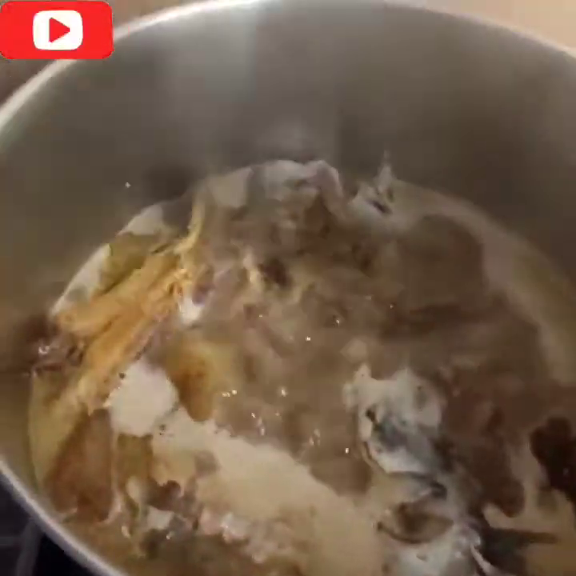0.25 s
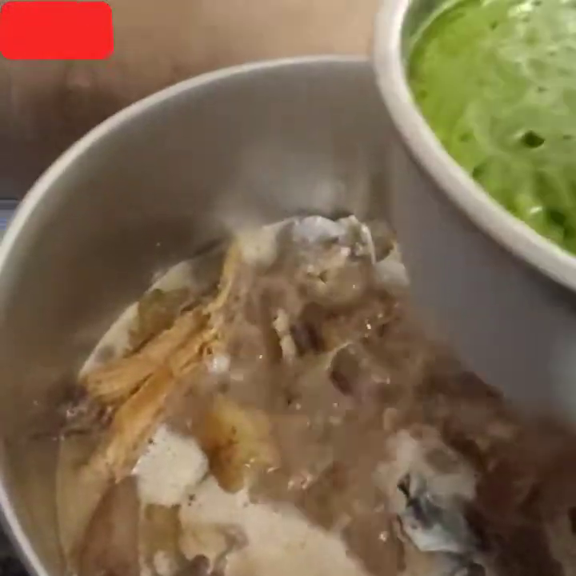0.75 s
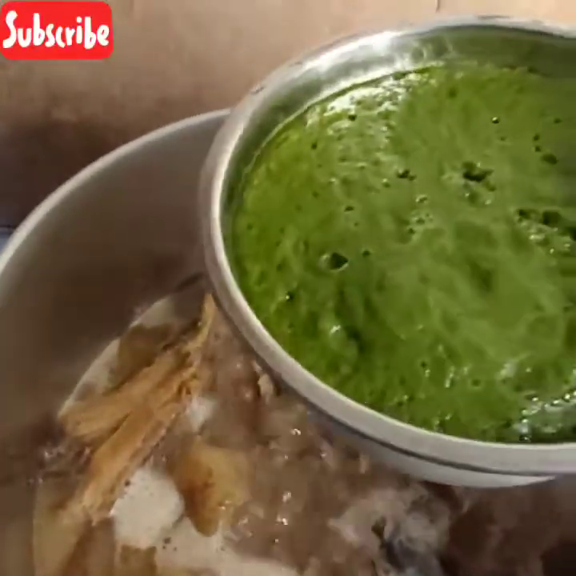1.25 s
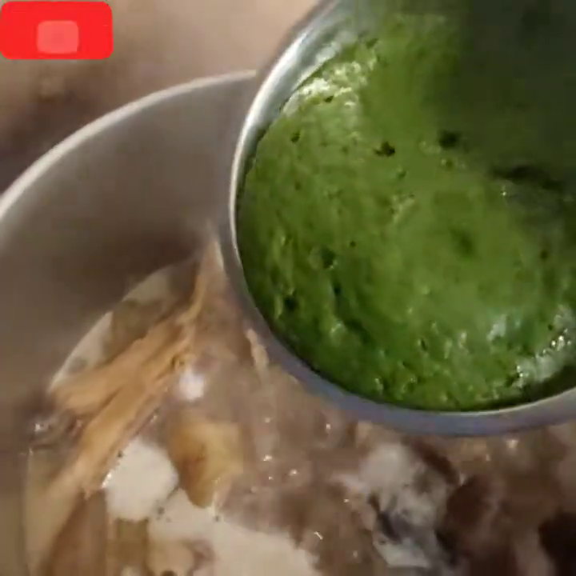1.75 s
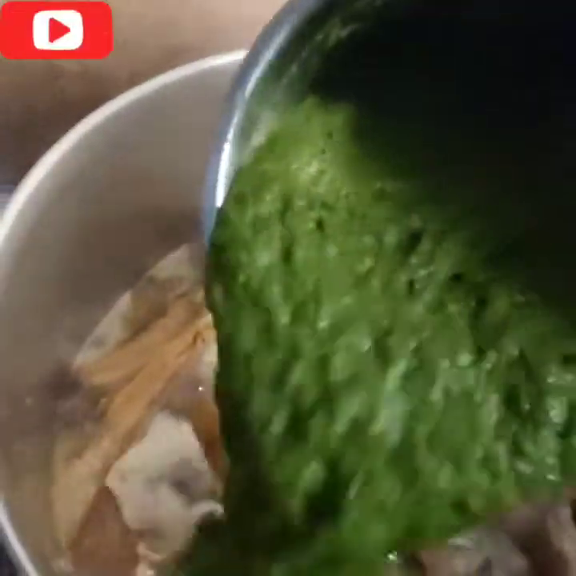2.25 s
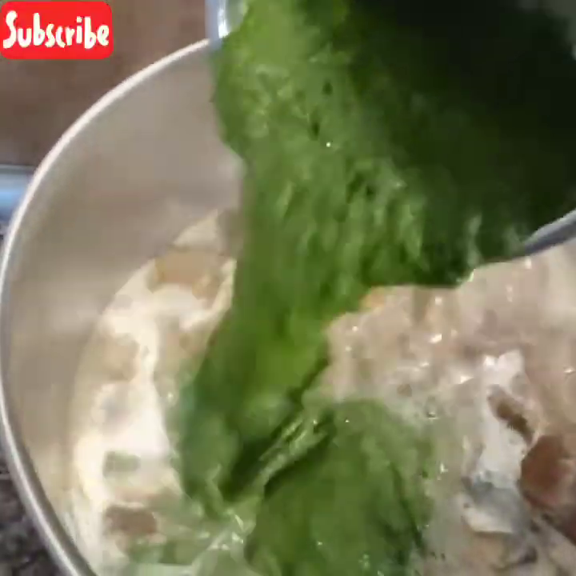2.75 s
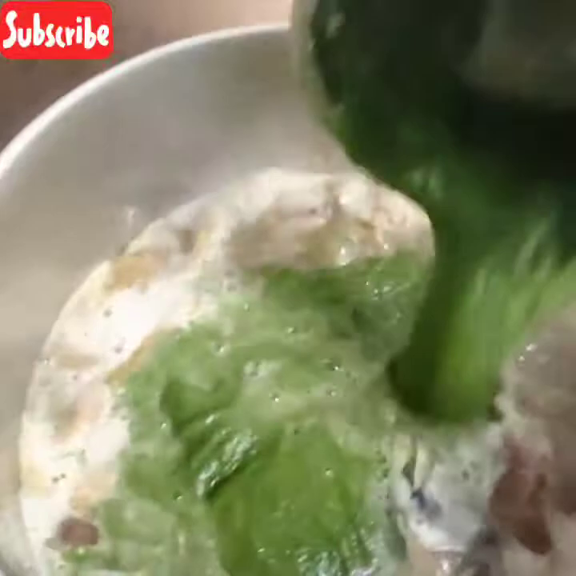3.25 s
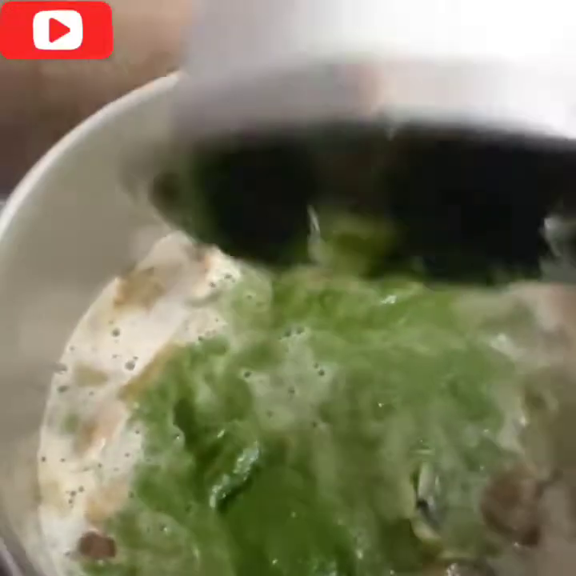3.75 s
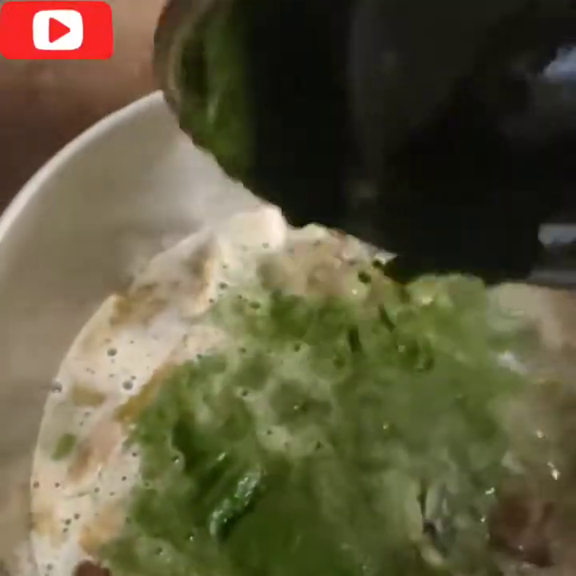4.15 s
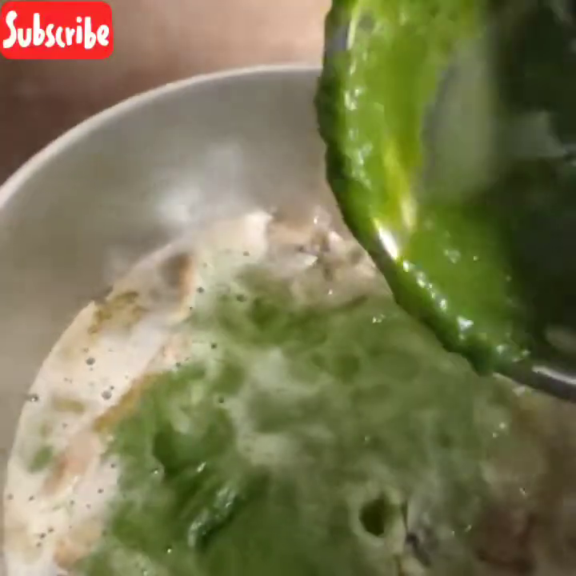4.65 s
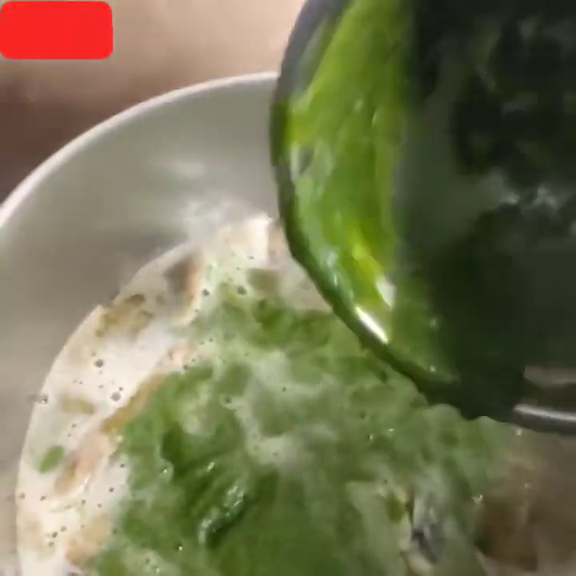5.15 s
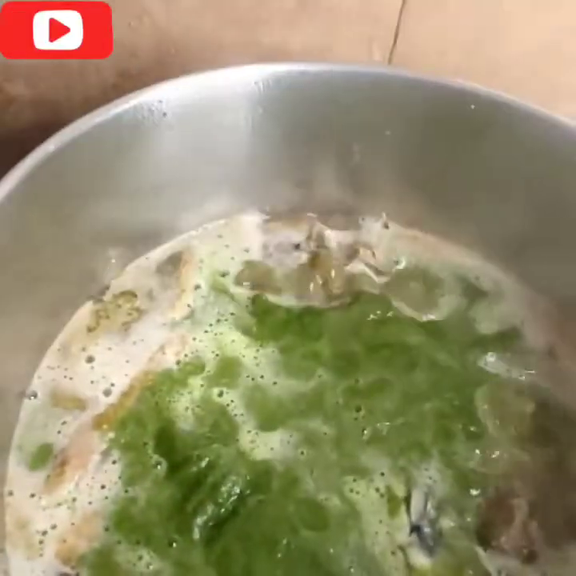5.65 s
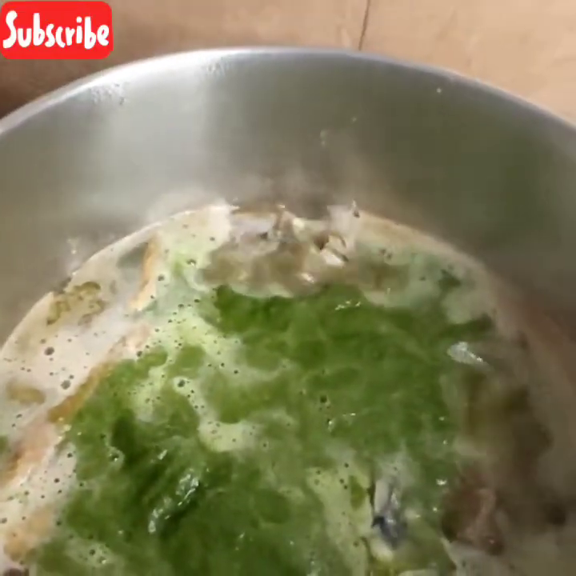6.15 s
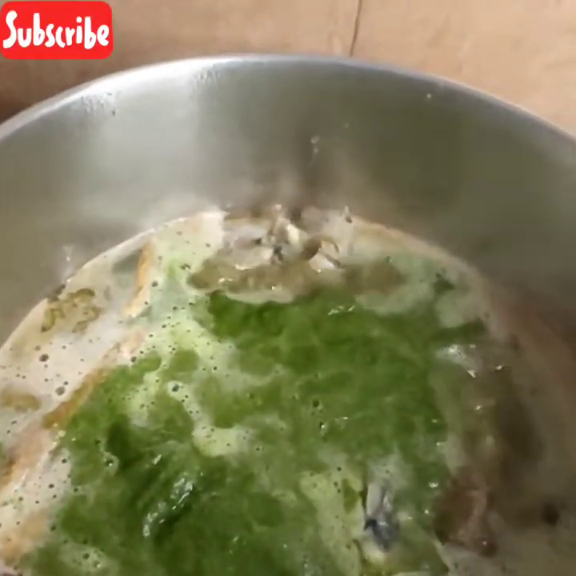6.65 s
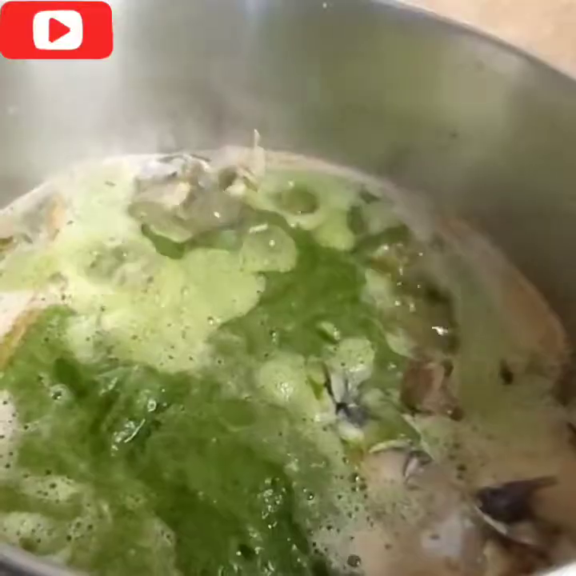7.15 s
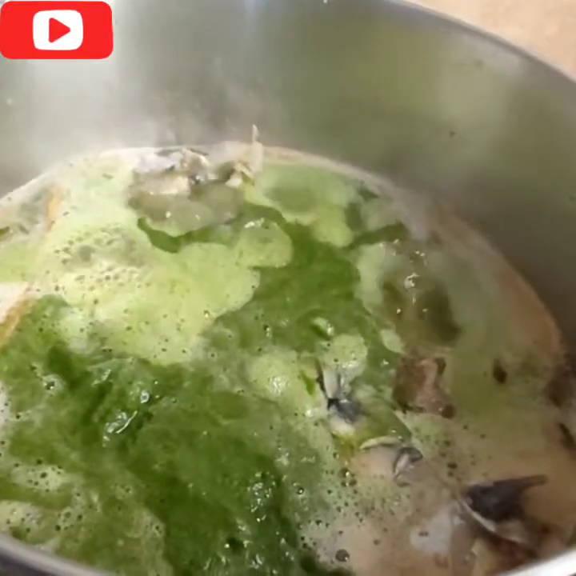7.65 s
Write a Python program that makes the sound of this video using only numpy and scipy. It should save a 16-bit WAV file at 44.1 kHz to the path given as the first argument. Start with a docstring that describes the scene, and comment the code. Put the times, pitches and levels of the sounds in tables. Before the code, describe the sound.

Thick soup boils in a steel pot, puree splatters in and muffles the bubbling, then an empty metal bowl knocks down sharply nearby.

```python
"""Soup boils in a steel pot: steam bubbles collapse in short sagging blips that ring the pot and its walls.
Bursting films spit as noise snaps and spray; froth, fizz and deep rumble are shaped noise and click trains.
A thick puree poured from a metal bowl splatters as wet smears and pings, then calms the boil.
The empty bowl lands nearby with a sharp knock and rocks once: contact pulses ring its modes in a small kitchen."""
import sys
import numpy as np
from scipy import signal
from scipy.fft import rfft, irfft
from scipy.io import wavfile
from scipy.ndimage import uniform_filter1d

SR = 44100
rng = np.random.default_rng(int(sys.argv[2]) if len(sys.argv) > 2 else 0)


def dump_mix(stems):
    """Bounce the given channels to the path in sys.argv[1] as a 16-bit WAV at rate SR."""
    frames = np.atleast_2d(stems).T  # one column per channel
    limited = np.clip(frames, -1, 1)  # hard clip at full scale
    pcm = np.round(limited * 32767).astype(np.int16)
    wavfile.write(sys.argv[1], SR, pcm)


N = 348831
TIME = np.arange(N) / SR
# the first puree reaches the broth, the stream is fullest, the stream breaks off (s)
POUR_START_S, POUR_FULLEST_S, POUR_END_S = 2.11, 2.75, 3.47


def gain_of(db):
    """Decibels to a factor."""
    return 10 ** (np.asarray(db) / 20)


def evened(x):
    """Scales to rms 1 over all channels."""
    return x / np.sqrt(np.mean(x ** 2) + 1e-20)


def unit(x):
    """Scales to energy 1 in each channel."""
    return x / np.sqrt(np.sum(x ** 2, -1, keepdims=True) + 1e-20)


def read(points, hz):
    """Reads a spectrum table on a log-frequency axis."""
    f, value = np.transpose(points)
    return np.interp(np.log(hz + 1), np.log(f + 1), value)


def follow_curve(points):
    """Draws a (time, value) table as a running curve."""
    return np.interp(TIME, *np.transpose(points))


def add(mix, s, sound):
    """Mixes a sound in at time s."""
    part = mix[..., max(round(s * SR), 0):][..., :sound.shape[-1]]
    part += sound[..., :part.shape[-1]]


def through(x, response):
    """Convolves, mono or stereo, and keeps the length of x."""
    return signal.oaconvolve(np.atleast_2d(x), np.atleast_2d(response), axes=1)[:, :x.shape[-1]]


def colour(x, points, size=8192):
    """A causal, minimum-phase filter with the given spectrum."""
    hz = abs(np.fft.fftfreq(size, 1 / SR))
    log_gain = np.log(gain_of(read(points, hz)))
    response = np.fft.ifft(np.exp(signal.hilbert(log_gain).conj())).real
    return through(x, response[:size // 2])


def pair(z, alike):
    """Makes two unrelated channels partly alike."""
    alike = np.clip(alike, 0, 1)
    return np.array([z[0], alike * z[0] + np.sqrt(1 - alike ** 2) * z[1]])


def noise_pair(alike, length=N):
    """Stereo white noise whose channels are partly alike."""
    return pair(rng.standard_normal((2, length)), alike)


def lean(x, points):
    """Tips a stereo sound to one side, band by band."""
    side_db = read(points, np.fft.rfftfreq(N, 1 / SR)) * np.array([[.5], [-.5]])
    return irfft(rfft(x) * gain_of(side_db), N)


def clicks(per_s, spread_db, count=6000):
    """A random train of mostly small and a few large impulses, at most `count` in all."""
    when, size, sign = rng.random((count, 3))[:int(per_s * N / SR)].T
    size = gain_of(spread_db * np.minimum(-np.log(1 - size), 3.5))
    return np.bincount((when * N).astype(int), size * np.sign(sign - .5), N)


def chance_events(gain, spread_db, hz, spread_octaves, count):
    """Rows (t/s, level/dB, f/Hz) at loose intervals, scattered around a running gain and pitch."""
    when, size, pitch = rng.random((count, 3)).T
    at = ((np.arange(count) + when) * N / count).astype(int)
    level_db = 20 * np.log10(gain[at]) + spread_db * (2 * size - 1)
    pitch_hz = (hz * np.ones(N))[at] * 2 ** (spread_octaves * (2 * pitch - 1))
    return np.transpose([at / SR, level_db, pitch_hz])


def ring(modes, apart_hz):
    """Dying modes; the higher ones reach the two microphones out of step."""
    t = np.arange(SR // 2) / SR
    sound = np.zeros((2, len(t)))
    for k, (hz, db, t60) in enumerate(modes):
        phase = (-1) ** k * np.array([[1], [-1]]) * min(hz / apart_hz, np.pi / 4)
        sound += gain_of(db - 60 * t / t60) * np.sin(2 * np.pi * hz * t + phase)
    return sound


# kitchen reverberation: (f/Hz, t60/s)
KITCHEN_DECAY = [(60, 0.16), (300, 0.047), (1000, 0.3), (3000, 0.4), (8000, 0.27), (16000, 0.17)]


def kitchen(x, alike_hz=650):
    """A diffuse tail, each band dying at its own speed, the bass alike on both sides."""
    hz, t, z = signal.stft(rng.standard_normal((2, SR // 2)), SR, nperseg=256)
    z = pair(z, 1 / (1 + (hz[:, None] / alike_hz) ** 4))
    z = z * gain_of(-60 * t / read(KITCHEN_DECAY, hz)[:, None])
    tail = signal.istft(z, SR, nperseg=256)[1]
    fade_in = np.clip(np.arange(tail.shape[1]) / SR / 0.005, 0, 1) ** 2
    return through(x, unit(tail * fade_in))


def scatter(t60, alike):
    """Dense reflections as noise that dies away over t60 seconds."""
    t = np.arange(SR // 5) / SR
    return unit(noise_pair(alike, len(t)) * gain_of(-60 * t / t60))


def places(count):
    """Sound comes from changing places: each place's share of it over time."""
    hop = SR // 40
    place = rng.integers(0, count, N // hop + 1).repeat(hop)[:N]
    return [np.sqrt(abs(uniform_filter1d(1. * (place == k), size=400))) for k in range(count)]


def walls(x, t60, alike, count=6):
    """Each place has its own pattern of reflections."""
    return sum(through(x * share, scatter(t60, alike)) for share in places(count))


def crackle(points, per_s, spread_db, hiss):
    """Countless tiny bursts with short echoes, over a smooth hiss, rms 1."""
    grains = walls(clicks(per_s, spread_db), t60=0.067, alike=0.014, count=4)
    return evened(colour(evened(grains) + hiss * rng.standard_normal((2, N)), points))


def pushes(contacts):
    """Contact force: longer contacts are duller, and the deepest bass is cut away."""
    force = np.zeros(N)
    for s, db, contact_ms in contacts:
        u = np.arange(SR // 50) / SR * 1000 / contact_ms
        push = u * np.exp(-4 * u)
        add(force, s, gain_of(db) * push / push.sum())
    return signal.sosfilt(signal.butter(3, 100, "highpass", fs=SR, output="sos"), force)


# rim chatter after each landing, and the landing that rings the bowl:
# (t/s, relative chatter level/dB, fade/s, relative ring level/dB, contact time/ms)
RIM_RATTLES = [(6.0445, -21.5, 0.05, -2, 0.17), (6.36, -32, 0.057, -3, 3.5)]
# chatter spectrum: (f/Hz, relative level/dB per Hz)
RATTLE_SPECTRUM = [(25, -52), (100, -11), (400, 5.5), (750, 2.5), (1000, -9), (1200, -6), (1500, -16),
                   (2100, -19), (2700, -21), (3400, -29.5), (6000, -37), (16000, -52)]


def rattle(rise_s=0.0018):
    """The rim chatters in many tiny contacts as the bowl settles."""
    chatter = np.zeros(N)
    for s, db, fade, _, _ in RIM_RATTLES:
        age = np.maximum(TIME - s, 0)
        chatter += gain_of(db) * (1 - np.exp(-age / rise_s)) * np.exp(-age / fade)
    return chatter * crackle(RATTLE_SPECTRUM, per_s=910, spread_db=7.5, hiss=0.47)


# the bowl meets the worktop: (t/s, relative level/dB, contact time/ms)
BOWL_KNOCKS = [(6.0438, -8.5, 0.1), (6.0457, 0.5, 1.6), (6.0495, -6.5, 0.24), (6.053, 3, 2.3),
               (6.0589, -18, 0.4), (6.0757, -8, 2), (6.3593, -9, 2.9), (6.366, -5.5, 2.6), (6.376, -8, 2.7),
               (6.393, -10, 5.3), (6.472, -17, 3)]
# thud spectrum: (f/Hz, relative level/dB)
THUD_SPECTRUM = [(20, -46), (60, -26), (120, -12), (220, 7.5), (420, 8.5), (800, 20.5), (1300, -11),
                 (2400, 5), (3400, -7), (5000, -1.5), (8000, -1), (11000, 4), (16000, -11)]
# modes of the metal bowl and the worktop under it: (f/Hz, relative level/dB, t60/s)
BOWL_MODES = [(122, -24, 0.25), (157, -19, 0.25), (287, -31, 0.3), (400, -24, 0.13), (450, -25, 0.2),
              (660, -24, 0.2), (758, -22, 0.26), (845, -33, 0.25), (1160, -20, 0.18), (1427, -42, 0.3),
              (1594, -26, 0.25), (1622, -21, 0.055), (1818, -27, 0.19), (1850, -30, 0.11),
              (1958, -33, 0.17), (2152, -23, 0.13), (2175, -33, .2), (2353, -33, 0.17), (2625, -38, 0.2),
              (2860, -37, 0.14), (3349, -49, .2), (4538, -51, 0.2), (4780, -35, 0.06)]


def bowl(thud_db=9, ring_db=2.5, clatter_db=11.5):
    """Rim and base land in quick succession on the worktop, and the metal rings on."""
    thud = colour(pushes(BOWL_KNOCKS), THUD_SPECTRUM)
    clatter = walls(thud, t60=0.022, alike=0.23)
    landings = pushes([(s, db, contact_ms) for s, _, _, db, contact_ms in RIM_RATTLES])
    ringing = through(landings, ring(BOWL_MODES, apart_hz=1500))
    return gain_of(thud_db) * thud + gain_of(clatter_db) * clatter + gain_of(ring_db) * ringing


# the puree spreads over the broth: (start t/s, end t/s)
PUREE_SPREAD = (2.4, 3.8)


def thickness():
    """0 in thin broth, 1 once the puree has spread over it."""
    return np.interp(TIME, PUREE_SPREAD, [0, 1])


def flow(start_db=-11, end_db=-11.5, land_s=0.015, drip_out_s=0.031):
    """The stream of puree swells to 1 at its fullest, thins, and drips out."""
    swell_db = np.interp(TIME, [POUR_START_S, POUR_FULLEST_S, POUR_END_S], [start_db, 0, end_db])
    landing = np.clip((TIME - POUR_START_S) / land_s, 0, 1)
    return gain_of(swell_db) * landing * np.exp(-np.maximum(TIME - POUR_END_S, 0) / drip_out_s)


def wetness(rest_db, thick_db, settle_db_per_s, pour_db):
    """Gain of a surface sound: steady on the broth, raised by the stream, then dying down under the puree."""
    settled_db = settle_db_per_s * np.maximum(TIME - POUR_END_S, 0)
    return np.hypot(gain_of(rest_db + thick_db * thickness() - settled_db), gain_of(pour_db) * flow())


# bubbles that stand out of the boil: (t/s, relative level/dB, nominal pitch f/Hz)
LOUD_POPS = [(0.07, -14, 770), (0.092, -15.5, 865), (0.181, -13, 790), (0.215, -18.5, 654),
             (0.327, -14, 720), (0.381, -19, 804), (0.493, -19, 610), (0.502, -18, 725), (0.559, -28, 674),
             (0.568, -10.5, 778), (0.598, -15, 660), (0.623, -12, 770), (0.73, -12, 682), (0.735, -16, 900),
             (0.771, -28, 630), (0.79, -18, 1070), (0.821, -21, 875), (0.882, -20, 706), (0.982, -16, 810),
             (1.056, -16.5, 626), (1.125, -32, 725), (1.156, -29, 710), (1.2, -13, 960), (1.21, -12.5, 854),
             (1.284, -17.5, 756), (1.301, -13, 900), (1.357, -17.5, 580), (1.396, -17, 660),
             (1.413, -13.5, 680), (1.46, -20, 970), (1.508, -13, 724), (1.552, -18, 694), (1.659, -19, 617),
             (1.719, -12, 680), (1.758, -15.5, 610), (1.778, -14, 750), (1.821, -17.5, 710),
             (1.86, -14, 724), (1.901, -14, 674), (1.991, -14.5, 643), (2.021, -19, 557), (2.075, -15, 660),
             (2.091, -7.5, 722), (2.12, -13, 646), (2.165, -7, 747), (2.217, -13.5, 674),
             (2.283, -17.5, 590), (2.31, -18.5, 700), (2.352, -15, 597), (2.381, -15.5, 720),
             (2.43, -17.5, 655), (2.492, -7, 786), (2.534, -10.5, 664), (2.621, -14.5, 586),
             (2.638, -15, 680), (2.666, -12, 710), (2.715, -9.5, 646), (2.822, -16.5, 542),
             (2.905, -15.5, 700), (2.928, -21, 650), (2.987, -17, 654), (3.152, -17, 540),
             (3.332, -20.5, 750), (3.436, -24.5, 710), (3.504, -19.5, 446), (3.522, -21, 630),
             (3.642, -17, 630), (3.649, -14, 700), (3.75, -15, 600), (3.867, -31, 476), (3.888, -22, 610),
             (3.931, -36, 540), (3.949, -23, 730), (3.963, -21.5, 670), (4.161, -20, 733), (4.26, -19, 715),
             (4.374, -25, 620), (4.387, -23, 720), (4.536, -29, 683), (4.578, -31, 640), (4.595, -24, 520),
             (4.621, -39, 710), (4.66, -39, 660), (4.753, -39, 535), (4.844, -28, 554), (4.98, -20, 627),
             (5.008, -19.5, 620), (5.034, -23, 686), (5.056, -37, 570), (5.095, -39, 590),
             (5.126, -43, 660), (5.174, -27.5, 490), (5.311, -26, 440), (5.341, -26, 485),
             (5.398, -23.5, 537), (5.438, -23.5, 570), (5.461, -36, 563), (5.503, -19.5, 564),
             (5.521, -20.5, 520), (5.635, -27, 640), (5.655, -24, 565), (5.841, -24.5, 680),
             (5.861, -26, 590), (5.901, -27.5, 620), (6.169, -26, 576), (6.505, -31.5, 614),
             (6.576, -27.5, 627), (6.664, -34.5, 545), (6.725, -31, 570), (6.871, -26.5, 563),
             (6.992, -17, 550), (7.012, -18, 644), (7.062, -18, 620), (7.109, -30, 655),
             (7.192, -27.5, 567), (7.225, -28.5, 720), (7.473, -30, 606), (7.644, -31, 700),
             (7.669, -23.5, 528), (7.722, -33, 516), (7.836, -27, 560), (7.849, -15, 740)]


def surge(lead_s=0.0042, fade_s=0.021):
    """Steam comes up in gulps: near 1 as each loud bubble collapses, fading to 0 in the lull after it."""
    t = np.arange(0, N, 64) / SR
    age = t - np.array(LOUD_POPS)[:, :1]
    gulps = np.exp(-abs(age) / np.where(age < 0, lead_s, fade_s)).sum(0)
    return np.interp(TIME, t, np.tanh(gulps))


# how hard the soup boils: (t/s, relative vigour level/dB)
BOIL_VIGOUR = [(0.0, 3.5), (1.45, 2), (1.85, -2.5), (2.1, -1), (2.65, 1.5), (3.2, -4), (3.8, -7),
               (4.3, -7.5), (4.42, -9.5), (4.62, -8.5), (5.1, -12), (5.26, -15.5), (5.42, -8),
               (5.75, -12.5), (6.2, -3.5), (6.31, -13.5), (6.5, -12.5), (6.72, -21.5), (7.05, -12),
               (7.38, -20), (7.5, -12.5), (7.9, -17.5)]


def boiling(follow, thick_db=0, surge_db=0):
    """Gain taking `follow` dB per dB of vigour, changing under the puree and swelling with each gulp."""
    return gain_of(follow * follow_curve(BOIL_VIGOUR) + thick_db * thickness() + surge_db * surge())


# the rolling of the thickened soup: (t/s, level/dB)
ROLL_LEVEL = [(2.9, -64), (3.1, -47), (3.45, -65), (3.7, -47), (4.05, -51), (4.45, -65), (4.68, -42.5),
              (4.9, -52), (5.04, -35), (5.23, -62), (5.5, -56), (5.9, -56.5), (6.9, -58), (7.35, -57),
              (7.9, -50)]
# deep rumble spectrum: (f/Hz, relative level/dB per Hz)
DEEP_SPECTRUM = [(20, -40), (38, -25), (50, 2), (60, 13.5), (78, -24), (130, -33), (400, -65)]


def roll():
    """The thickened soup heaves as a whole, with a deep rumble."""
    return gain_of(follow_curve(ROLL_LEVEL)) * evened(colour(noise_pair(alike=0.9), DEEP_SPECTRUM))


# foam swells: (t/s, level/dB before the rise and fade, rise/s, fade/s)
FOAM_SWELLS = [(7.03, -54, 0.038, 0.11), (7.19, -63.5, 0.033, 0.18), (7.435, -64, 0.0068, 0.052),
               (7.7, -61, 0.032, 0.46)]
# foam hiss spectrum: (f/Hz, relative level/dB per Hz)
FOAM_SPECTRUM = [(1500, -15), (2500, 4), (3200, -4), (4150, 1), (5500, -6), (7500, -7), (10000, -12),
                 (16000, -19)]


def foam():
    """Near the end, fresh foam wells up through the puree and lets out steam in a few soft swells."""
    hiss = evened(colour(noise_pair(alike=0.1), FOAM_SPECTRUM))
    swell = np.zeros(N)
    for s, db, rise, fade in FOAM_SWELLS:
        age = np.maximum(TIME - s, 0)
        swell += gain_of(db) * (1 - np.exp(-age / rise)) * np.exp(-age / fade)
    return swell * hiss


def blip(hz, rise=0.00095, fall=0.0018, sag=0.15, lead=0.002924):
    """A collapsing bubble: a few cycles whose pitch sags, loudest `lead` seconds in."""
    t = np.arange(SR // 50) / SR - lead
    shape = np.where(t < 0, np.exp(-.5 * (t / rise) ** 2), 1 / np.cosh(t / fall * 1.89))
    pitch = hz * (1 - np.clip(sag, 0, .6) * np.tanh(t / 0.00066))
    return lead, shape * np.sin(2 * np.pi * (np.cumsum(pitch) / SR + rng.random()))


def crowd(low_hz, high_hz, per_s, spread_db, cycles, count=14):
    """Weak collapses at random, rms 1; middling sizes are strongest, and per_s counts each size."""
    weights = np.hanning(count + 4)[2:-2] ** .5
    out = np.zeros(N)
    for hz, weight in zip(np.geomspace(low_hz, high_hz, count), weights):
        moments = clicks(per_s, spread_db)
        _, collapse = blip(hz, rise=.5 / hz, fall=cycles / hz)
        out += weight * through(moments, collapse)[0]
    return evened(out)


def squelches(points, per_s, spread_db, last):
    """Short wet smears of noise at random moments, rms 1."""
    t = np.arange(SR // 20) / SR
    power = abs(through(clicks(per_s, spread_db) ** 2, (t * np.exp(-t / last)) ** 2))
    return evened(np.sqrt(power) * colour(noise_pair(alike=0.064), points))


def splatter():
    """Lumps of puree slap the surface; the coarse and the fine spray fly separately."""
    # spectra: (f/Hz, relative level/dB per Hz)
    wet = squelches([(1200, -25), (2300, 13.0), (4500, -9), (7000, -23), (16000, -15)],
                    per_s=70, spread_db=3.5, last=0.0026)
    fine = squelches([(2500, -27), (6000, -3), (8000, -5), (13000, 10), (16000, -11)],
                     per_s=60, spread_db=6.0, last=0.0018)
    return (wet * wetness(rest_db=-62.5, thick_db=-22, settle_db_per_s=2, pour_db=-47.5)
            + fine * wetness(rest_db=-79.5, thick_db=12, settle_db_per_s=4.5, pour_db=-50))


def droplets():
    """Tiny trapped bubbles ping at pitches of their own, strongest while the puree falls."""
    pings = crowd(low_hz=2600, high_hz=14000, per_s=14, spread_db=3.5, cycles=5)
    pings = evened(through(pings, scatter(t60=0.02, alike=0.061)))
    return pings * wetness(rest_db=-60.5, thick_db=-33.0, settle_db_per_s=4, pour_db=-50.5)


def patchy(x, patchy_db):
    """Breaks spray into loud and quiet patches of pitch, a few milliseconds long."""
    z = signal.stft(x, nperseg=128)[2]
    patches = uniform_filter1d(rng.standard_normal(z.shape[1:]), size=4, axis=0)
    patches = evened(uniform_filter1d(patches, size=4, axis=1))
    return evened(signal.istft(z * gain_of(patchy_db * patches), nperseg=128)[1][:, :N])


# bright spray spectrum: (f/Hz, relative level/dB per Hz)
SPRAY_SPECTRUM = [(1500, -7.5), (3000, -1.5), (4200, 2), (5500, -2), (7500, 0), (8800, -4.5), (12500, -3.5),
                  (16000, -7.5)]
# duller spray of thin broth: (f/Hz, relative level/dB per Hz)
BROTH_SPRAY_SPECTRUM = [(1500, -8), (3000, 1), (4200, 2), (5500, -1), (7500, -2), (8800, -8), (12500, -9),
                        (16000, -18)]
# where the spray lands: (t/s, left over right level/dB)
SPRAY_PAN = [(2.2, 3), (2.55, -7), (2.75, -4), (3.1, 1.5)]


def spray(clump_db=1.5, drops_per_s=1300):
    """Separate droplets: dull from the broth, finer and brighter once the puree falls."""
    clumps = gain_of(clump_db * evened(uniform_filter1d(rng.standard_normal(N), size=70)))
    hits = .25 + 3. * (rng.random(N) < drops_per_s / SR)
    drops = clumps * hits * noise_pair(alike=0.07)
    from_puree = evened(colour(drops, SPRAY_SPECTRUM))
    from_broth = evened(colour(drops, BROTH_SPRAY_SPECTRUM))
    mist = patchy(np.where(TIME > POUR_START_S, from_puree, from_broth), patchy_db=4.5)
    return mist * gain_of(follow_curve(SPRAY_PAN) * np.array([[.5], [-.5]]))


def ticks():
    """Single specks of spray click sharply on the steel wall."""
    specks = clicks(per_s=70, spread_db=3.5)
    specks = through(specks, scatter(t60=0.002, alike=0.3)) + .6 * through(specks, scatter(t60=0.025, alike=0.1))
    specks = evened(colour(specks, SPRAY_SPECTRUM))
    return specks * wetness(rest_db=-61, thick_db=-14, settle_db_per_s=10, pour_db=-45.5)


def lumps(lumpy_db):
    """Spray and clots come unevenly: a gain that jumps about."""
    wander = uniform_filter1d(uniform_filter1d(rng.standard_normal(N), size=600), size=200)
    return gain_of(lumpy_db * evened(wander))


# froth spectrum: (f/Hz, relative level/dB per Hz)
FROTH_SPECTRUM = [(500, -2.5), (1000, 3), (1480, -2.5), (1850, -6.5), (2200, -9.5), (2650, -12.5),
                  (3150, -21), (4200, -21.5), (6000, -22), (16000, -55)]
# steam hiss over the thickened soup: (f/Hz, relative level/dB per Hz)
STEAM_SPECTRUM = [(1500, -3), (2500, 6), (3200, -4.5), (4200, 5.5), (5500, -0.5), (7500, 4.5), (8800, -1.5),
                  (12500, -2.5), (16000, -16)]


def surface(froth_db=-47.0, tiny_db=-48, churn_db=6, smother_s=0.58):
    """Froth gurgles, ticks and fizzes; the stream churns it, then puree smothers its smallest bubbles."""
    tiny = crowd(low_hz=1050, high_hz=2600, per_s=6, spread_db=4.2, cycles=2.8)
    tiny = evened(walls(tiny, t60=0.06, alike=0.052)) * gain_of(-12 * thickness())
    froth = crackle(FROTH_SPECTRUM, per_s=300, spread_db=2.5, hiss=0.45)
    froth = gain_of(froth_db) * froth + gain_of(tiny_db) * tiny
    churned = np.hypot(boiling(follow=0.52, thick_db=-5.0, surge_db=3.5), gain_of(churn_db) * flow())
    # the crackling fizz gives way to smooth steam after the pour
    fizz = crackle(SPRAY_SPECTRUM, per_s=260, spread_db=5, hiss=.6)
    steam = evened(colour(rng.standard_normal((2, N)), STEAM_SPECTRUM))
    smothered = np.clip((TIME - POUR_END_S) / smother_s, 0, 1)
    fizz = np.sqrt(1 - smothered) * fizz + np.sqrt(smothered) * steam
    clots = lumps(lumpy_db=3.2 * np.sqrt(flow()) + 1.3 * (1 - thickness()))
    wet = wetness(rest_db=-61, thick_db=-0.5, settle_db_per_s=1.74, pour_db=-47.5)
    return froth * churned + fizz * clots * wet


def lesser_spits(spit_db=-47, pitch_hz=1750, bright_db=-15):
    """Small films burst all the time, loudest with each gulp; the puree smothers them."""
    gain = gain_of(spit_db) * boiling(follow=0.6, thick_db=-16, surge_db=5)
    rows = chance_events(gain, spread_db=4.5, hz=pitch_hz, spread_octaves=0.22, count=90)
    return [(*row, bright_db) for row in rows]


def cavity_ring(t, hz, glide=0.1, glide_s=0.017):
    """The air under a bursting film rings at a pitch that rises as the hole opens."""
    pitch = hz * (1 + glide * (np.tanh(t / glide_s) - .4))
    turns = np.cumsum(pitch) / SR + rng.random()
    side_turns = np.array([[0], [.35]]) * rng.random()
    return np.sqrt(2) * np.sin(2 * np.pi * (turns + side_turns))


# loudest films bursting and drops landing:
# (t/s, relative level/dB, nominal pitch f/Hz, relative spray over snap level/dB)
LOUD_SPITS = [(0.016, -38.5, 2320, -19), (0.049, -48, 8050, 2), (0.114, -35.5, 1675, -20),
              (0.156, -45, 4540, 22), (0.209, -31.5, 1550, -11), (0.24, -32.5, 4130, -14),
              (0.314, -37.5, 1910, -20), (0.597, -36, 1410, -37), (0.625, -32, 1880, -34),
              (0.658, -33.5, 2940, -10), (0.738, -38.5, 1860, -28), (0.791, -36.5, 1420, -10),
              (0.841, -25, 2353, -7.5), (0.945, -45, 4670, 0), (0.979, -27, 1500, -12.5),
              (0.989, -30, 1840, -1), (1.053, -32, 1460, -30), (1.123, -39.5, 1970, -15),
              (1.2, -23.5, 1500, -18), (1.282, -31.5, 2450, -28), (1.299, -26.5, 1405, -18),
              (1.31, -28.5, 3110, 9), (1.428, -33, 2560, -10), (1.501, -28.5, 1370, -20),
              (1.617, -39.5, 2240, -29), (1.675, -39, 2270, -28), (1.771, -28, 1986, -12.5),
              (1.901, -35, 2070, -5.5), (1.92, -37, 3080, -1), (1.969, -44.5, 7290, -3),
              (2.077, -30, 1480, -43), (2.111, -30.5, 1850, -8), (2.148, -38.5, 1550, 3),
              (2.167, -25, 1600, -17), (2.181, -39.5, 1540, 9), (2.214, -37, 7400, 2),
              (2.303, -35.5, 6650, -5), (2.349, -32.5, 7450, 9), (2.404, -37, 1420, -12),
              (2.421, -35, 2640, -7), (2.471, -31, 1430, 4), (2.496, -39, 2720, 19), (2.524, -32, 2280, -7),
              (2.538, -28, 1540, -3), (2.544, -27.5, 6000, 1), (2.58, -27, 1430, -1), (2.591, -39, 6000, 5),
              (2.62, -30, 1530, -20), (2.627, -26.5, 2380, -2), (2.667, -27, 2080, 9),
              (2.679, -25.5, 8150, 2), (2.683, -25.5, 1452, -19), (2.706, -36, 7000, 12),
              (2.778, -31.5, 3340, 1), (2.814, -36.5, 3750, 12), (2.891, -33.5, 2190, -28),
              (2.923, -30.5, 1540, -9), (2.958, -34, 5960, 8), (2.97, -22, 2304, 1.5), (2.98, -41, 2800, 4),
              (3.006, -29.5, 2236, -24), (3.041, -39.5, 2300, 17), (3.068, -38, 2190, 10),
              (3.11, -37, 2160, 3), (3.127, -27.5, 2270, 6.5), (3.232, -36.5, 2240, 3),
              (3.261, -30, 2120, -1.5), (3.361, -36, 7040, 2), (3.415, -31, 6900, 1),
              (3.432, -38, 11000, -8), (3.48, -33.5, 6200, -2), (3.757, -44.5, 1650, -4),
              (3.984, -50, 2940, 7), (4.045, -44, 8900, 9), (4.291, -53, 4500, 12), (4.389, -49, 10200, 3),
              (4.585, -51, 1500, -5), (5.251, -55, 7750, -2), (5.44, -52, 1500, -20),
              (5.501, -49, 1600, -18), (5.521, -55, 1450, -20)]


def spits(snap_db=-0.5, spray_db=1, rise=0.00086, fall=0.0092, doubling_db=22, usual_db=-30, width=0.4):
    """Each bursting film gives a pitched snap and a short spray of droplets; bigger bursts last longer."""
    t = np.arange(SR // 10) / SR
    snaps, spray_power = np.zeros((2, N)), np.zeros(N)
    for s, db, hz, bright_db in LOUD_SPITS + lesser_spits():
        # the fade doubles for each doubling_db of level, but never drops below 0.7 of fall
        fade = fall * 2 ** (max(db - usual_db, -doubling_db / 2) / doubling_db)
        shape = (1 - np.exp(-t / rise)) * np.exp(-t / fade)
        shape /= shape.max()
        spray_share = 1 / (1 + gain_of(-bright_db) ** 2)
        cavity = signal.butter(2, [hz / (1 + width), hz * (1 + width)], "bandpass", fs=SR)
        snap = evened(signal.lfilter(*cavity, noise_pair(alike=0.36, length=len(t))))
        # low snaps are more tone, high ones more noise
        clean = .7 / (1 + (hz / 3200) ** 4)
        snap = np.sqrt(1 - clean) * snap + np.sqrt(clean) * cavity_ring(t, hz)
        add(snaps, s, gain_of(db + snap_db) * np.sqrt(1 - spray_share) * shape * snap)
        add(spray_power, s, spray_share * (gain_of(db + spray_db) * shape) ** 2)
    return snaps + np.sqrt(spray_power) * spray()


# slow, heavy bubbles that thump the bottom of the pot: (t/s, relative level/dB, f/Hz)
HEAVY_THUMPS = [(0.168, -23, 115), (0.309, -33, 122), (0.663, -20, 307), (0.973, -26, 310),
                (1.487, -26, 138), (2.349, -26, 102), (2.815, -27, 122), (2.883, -19.5, 312),
                (3.144, -22, 140), (3.632, -25, 97), (3.743, -28, 308), (4.223, -29.5, 137),
                (4.576, -25, 316), (4.953, -30, 157), (5.492, -32, 138)]


def thumps(thump_db=-5, cycles=3.5):
    """Big pockets of steam give a few slow swings each."""
    out, t = np.zeros(N), np.arange(SR // 8) / SR
    for s, db, hz in HEAVY_THUMPS:
        swings = t * hz
        shape = (1 - np.exp(-swings / .5)) * np.exp(-swings / cycles)
        add(out, s, gain_of(db + thump_db) * shape / shape.max() * np.sin(2 * np.pi * swings))
    return out


def glug(hz, cycles, climb):
    """A round bubble rings for a few cycles, its pitch climbing as it nears the surface."""
    turns = np.arange(SR // 20) / SR * hz
    shape = (1 - np.exp(-turns / .7)) ** 2 * np.exp(-turns / cycles)
    pitch = hz * (1 + climb * np.tanh(turns / (2 * cycles)))
    return shape * np.sin(2 * np.pi * np.cumsum(pitch) / SR)


# clusters glugging up through the soup: (t/s, length/s, relative level/dB, middle pitch f/Hz)
GLUG_CLUSTERS = [(2.461, 0.1, -34.5, 720), (2.641, 0.22, -34, 640), (2.86, 0.084, -36.5, 584),
                 (3.13, 0.07, -36.5, 566), (3.92, 0.12, -53, 546), (4.228, 0.061, -41, 616),
                 (4.491, 0.15, -43, 658), (4.675, 0.23, -50, 566), (4.937, 0.22, -43, 572),
                 (5.378, 0.19, -41.5, 501), (5.931, 0.12, -41.5, 516), (6.203, 0.068, -49, 508)]


def gurgles(gurgle_db=0.0, cycles=3.4, climb=0.089, spread_octaves=0.37, apart=0.5, count=14):
    """Each cluster is a run of overlapping glugs, each at its own pitch, that swells and dies away."""
    out = np.zeros((2, N))
    for s, length, db, hz in GLUG_CLUSTERS:
        run = np.zeros((2, SR // 2))
        for k, (when, size, pitch, side) in enumerate(rng.random((count, 4))):
            along = (k + when) / count
            sound = glug(hz * 2 ** (spread_octaves * (2 * pitch - 1)), cycles, climb)
            pan = 1 + apart * (2 * side - 1) * np.array([[1], [-1]])
            add(run, along * length, pan * np.sqrt(np.sin(np.pi * along)) * (.5 + size) * sound)
        add(out, s, gain_of(db + gurgle_db) * unit(run) * np.sqrt(length * SR))
    return out


# nominal modes of the filled pot on the stove: (f/Hz, relative level/dB, t60/s)
POT_MODES = [(105, -6.5, 0.28), (122, -6, 0.12), (159.3, 4.5, 0.15), (217.6, 0, 0.094), (296.4, -11, 0.11),
             (313.6, 0, 0.16), (388, -12.5, 0.084), (490, -12, 0.15), (552.3, -5.5, 0.054),
             (620, -2, 0.026), (770, -11.5, 0.041), (899, -5.5, 0.062), (1190, -9, 0.042)]


def pot_ring(x, count=9):
    """The sloshing soup loads the pot unevenly, so each place rings with its own pitches and strengths."""
    out = np.zeros((2, N))
    for share in places(count):
        # up to 4.5 % in pitch and 4 dB in level
        shift, louder_db = rng.uniform(-1, 1, (2, len(POT_MODES))) * [[.045], [4]]
        modes = [(hz * (1 + d), db + e, t60) for (hz, db, t60), d, e in zip(POT_MODES, shift, louder_db)]
        out += through(x * share, ring(modes, apart_hz=1190))
    return out


def small_bubbles(thin_db=-39.5, thick_db=-40.5):
    """The steady boil between the large collapses; the puree narrows its pitches and rounds it."""
    thin_soup = crowd(low_hz=410.6, high_hz=1024, per_s=16, spread_db=1.5, cycles=2.25)
    thick_soup = crowd(low_hz=440, high_hz=900, per_s=16, spread_db=4.5, cycles=2.66)
    blend = (np.sqrt(1 - thickness()) * gain_of(thin_db) * thin_soup
             + np.sqrt(thickness()) * gain_of(thick_db) * thick_soup)
    return blend * boiling(follow=0.72, surge_db=-1.5)


def lesser_pops(pop_db=-23.0, thin_hz=720, thick_hz=590):
    """Middling bubbles, loudest around the loud pops and in a hard boil, lower in thick soup."""
    gain = gain_of(pop_db) * boiling(follow=1.0, thick_db=-1.0, surge_db=9.0)
    hz = thin_hz + (thick_hz - thin_hz) * thickness()
    return chance_events(gain, spread_db=4.0, hz=hz, spread_octaves=0.26, count=120)


def big_bubbles(pop_db=-3.0, birth_db=-14, overtone=2.18, crisp_db=-21, muffle_db=-4):
    """A bubble breaks loose softly, collapses, and sheds a small, higher satellite that the puree muffles."""
    bodies, satellites = np.zeros((2, N))
    pops = [*LOUD_POPS, *lesser_pops()]
    for (s, db, hz), (size, late, life) in zip(pops, rng.random((len(pops), 3))):
        lead, collapse = blip(hz)
        start = s - lead
        add(bodies, start, gain_of(db + pop_db) * collapse)
        # breaking loose starts 3 to 10 ms ahead of the collapse
        birth = blip(0.805 * hz, rise=0.00043, fall=0.0015)[1]
        add(bodies, start - .003 - 0.007 * life, gain_of(db + birth_db) * birth)
        satellite = blip(hz * overtone * (0.705 + .5 * size))[1]
        add(satellites, start + 0.00217 * late, gain_of(db) * satellite)
    return bodies + satellites * gain_of(crisp_db + muffle_db * thickness())


# rumble spectrum: (f/Hz, relative level/dB per Hz)
RUMBLE_SPECTRUM = [(20, -49), (36, -36), (54, 3.5), (76, -5.5), (106, 9), (160, 0), (215, -12.5), (310, 3),
                   (400, -17.5), (700, -57.5), (2000, -44)]


def boil(ring_db=-40.0, walls_db=-7.5, shove_db=-45, rumble_db=-40.0):
    """Bubbles heard directly, off the walls and through the pot, which the rolling soup also shakes."""
    bubbles = big_bubbles() + small_bubbles()
    reflected = gain_of(walls_db) * walls(bubbles, t60=0.089, alike=0.92)
    ringing = gain_of(ring_db) * pot_ring(bubbles)
    band = signal.butter(2, [50, 380], "bandpass", fs=SR)
    shoves = signal.lfilter(*band, clicks(per_s=160, spread_db=5.5))
    heave = gain_of(shove_db) * evened(pot_ring(shoves)) * boiling(follow=0.81, thick_db=2.5, surge_db=4)
    rumble = gain_of(rumble_db) * evened(colour(noise_pair(alike=0.94), RUMBLE_SPECTRUM))
    rumble = rumble * boiling(follow=0.59, thick_db=2.0)
    return bubbles + reflected + ringing + gurgles() + thumps() + heave + rumble


# the bowl stands to the right, its treble shaded from the left microphone: (f/Hz, left over right level/dB)
BOWL_PAN = [(120, -1), (400, 0), (1000, -0.5), (2000, -0.5), (4200, -2), (8000, -2), (12000, -8)]


def scene(pot_room_db=-12, bowl_room_db=-6):
    """The pot is close by; the bowl, further off, sends more of its sound into the room."""
    soup = boil() + roll() + surface() + splatter() + droplets() + ticks() + spits() + foam()
    knock = lean(bowl() + rattle(), BOWL_PAN)
    return soup + knock + kitchen(gain_of(pot_room_db) * soup + gain_of(bowl_room_db) * knock)


# sensitivity of the left microphone over the right: (f/Hz, level/dB)
MICROPHONE_BALANCE = [(60, -0.5), (125, -2.5), (250, -4), (500, -0.5), (1000, -1.5), (2000, -1.5),
                      (4200, 2), (8000, -1.5), (12000, -4)]


def record(dry, edge_hz=16000):
    """Two unequal microphones, a soft ceiling on the loudest peaks, and the band limit."""
    heard = lean(dry, MICROPHONE_BALANCE)
    heard = heard / (1 + (heard / .8) ** 4) ** .25
    lowpass = signal.firwin(511, edge_hz, window=("kaiser", 9), fs=SR)
    return signal.oaconvolve(heard, lowpass[None], "same")


dry = scene()
out = record(dry)
dump_mix(out)
```